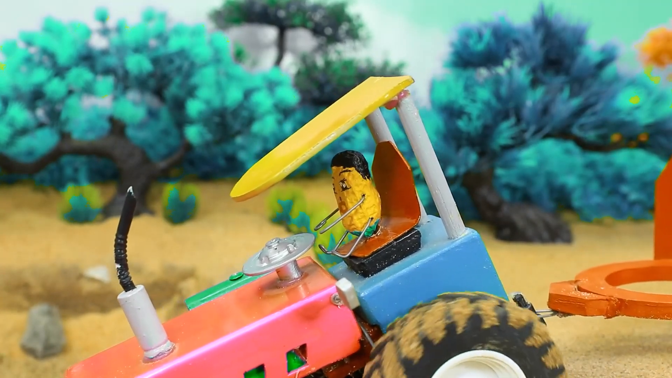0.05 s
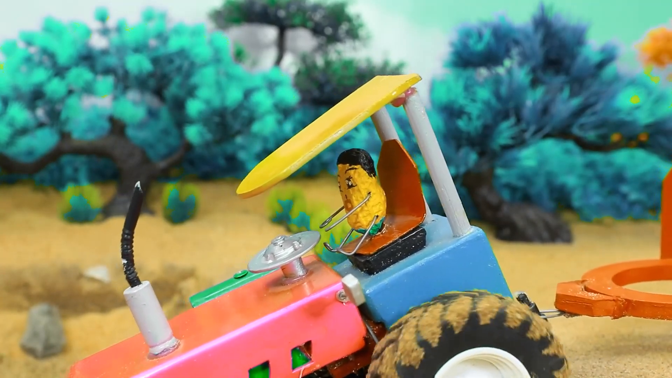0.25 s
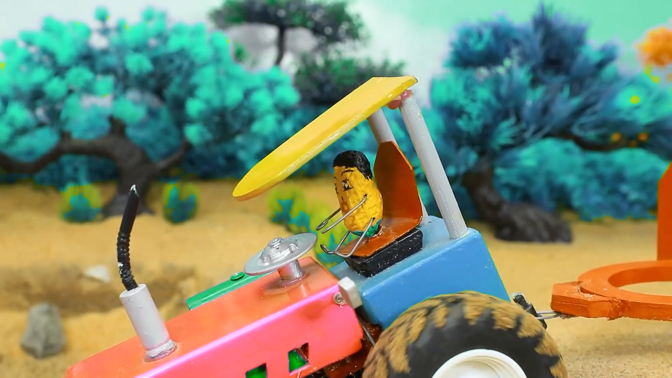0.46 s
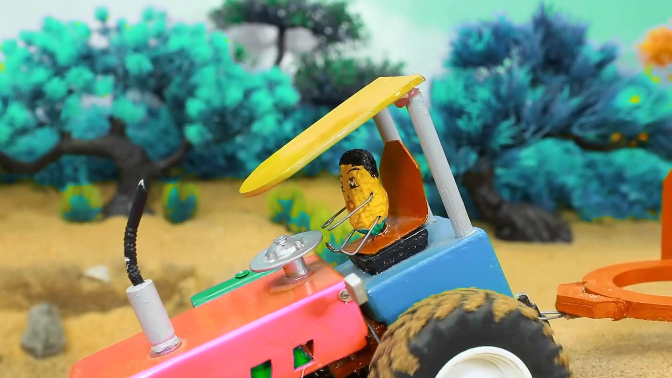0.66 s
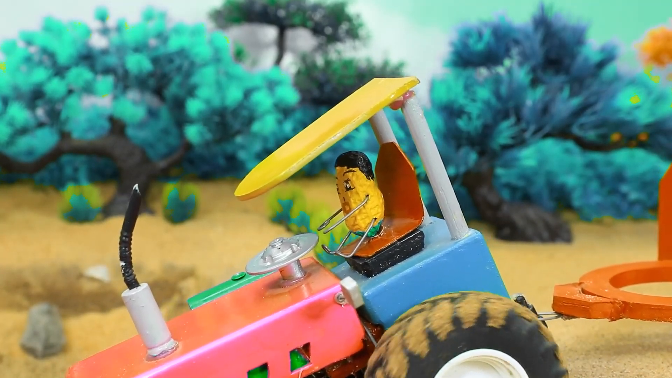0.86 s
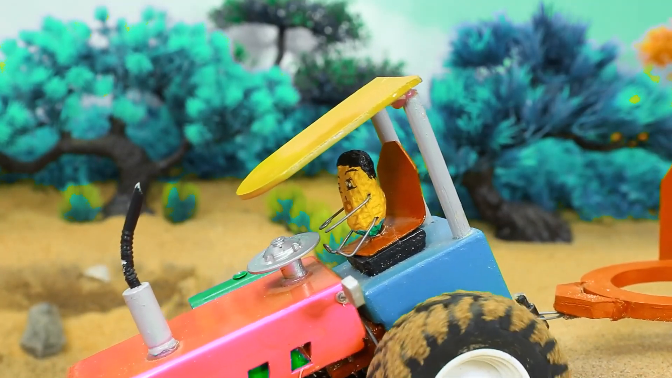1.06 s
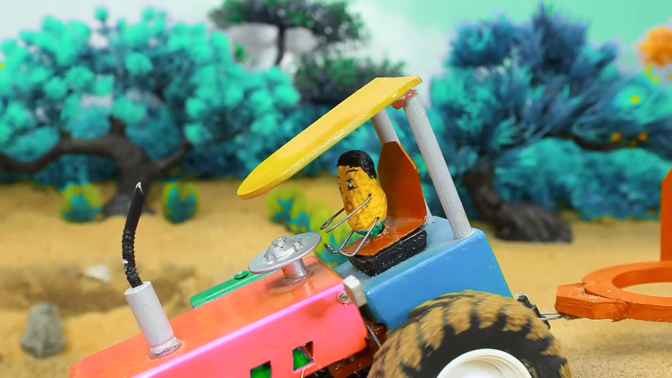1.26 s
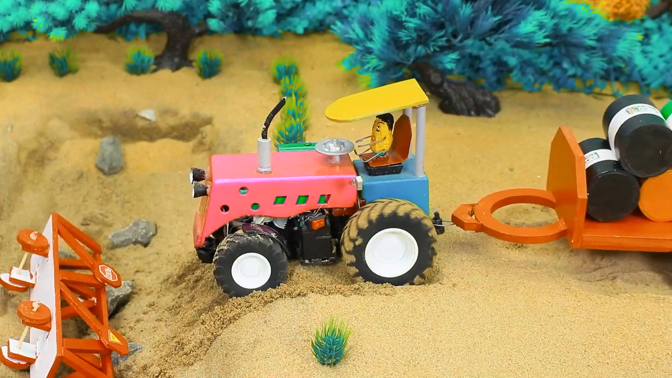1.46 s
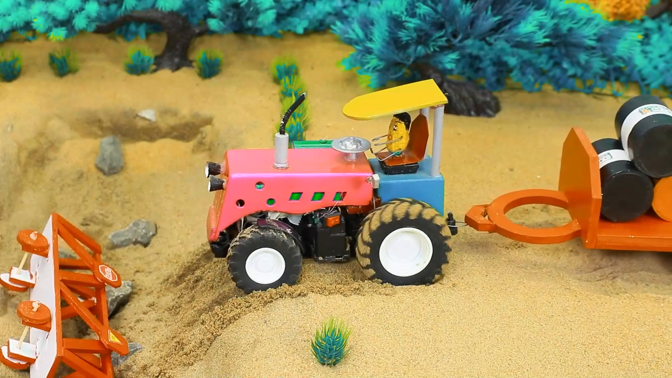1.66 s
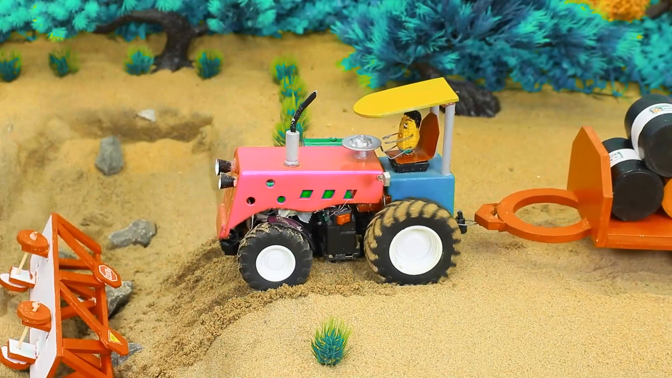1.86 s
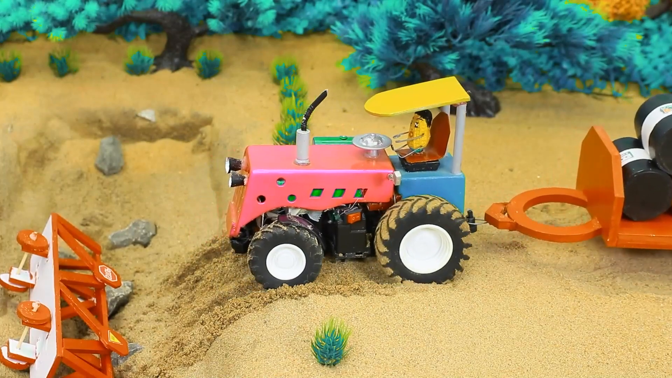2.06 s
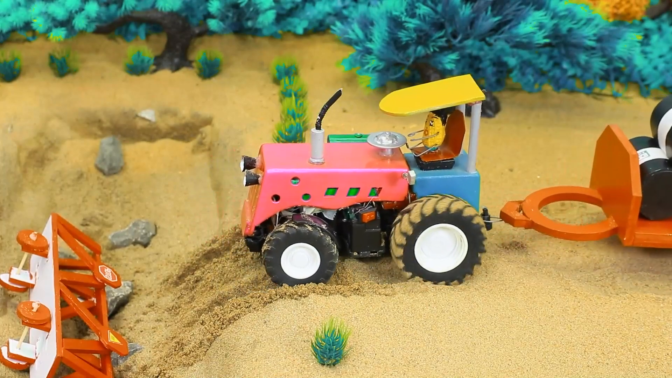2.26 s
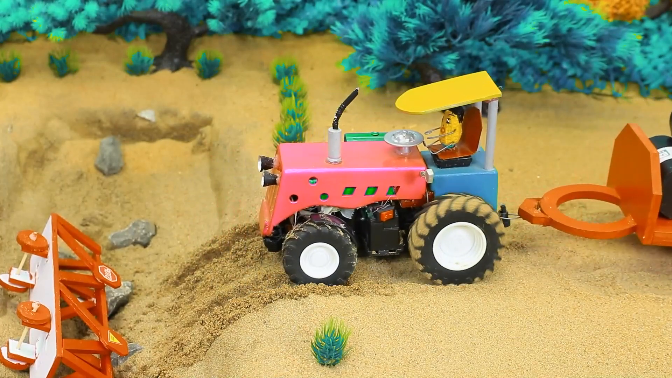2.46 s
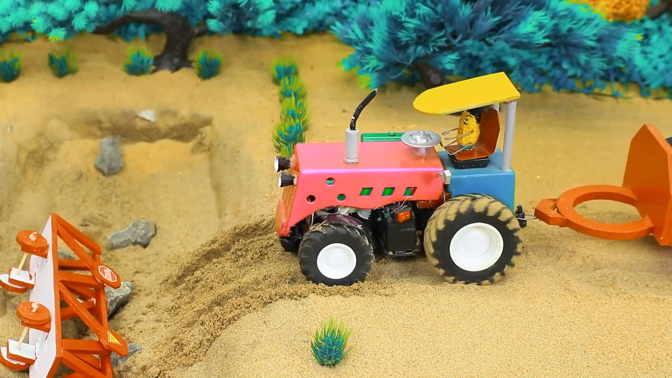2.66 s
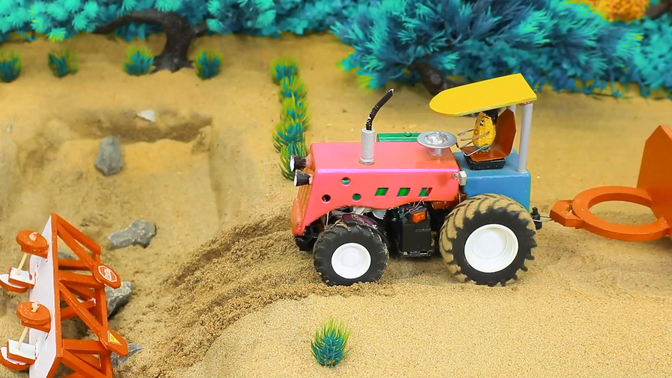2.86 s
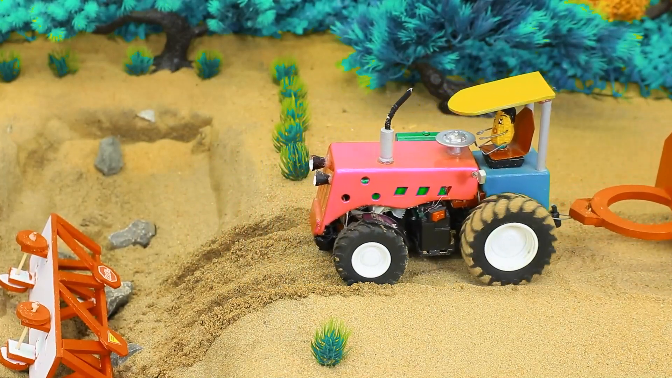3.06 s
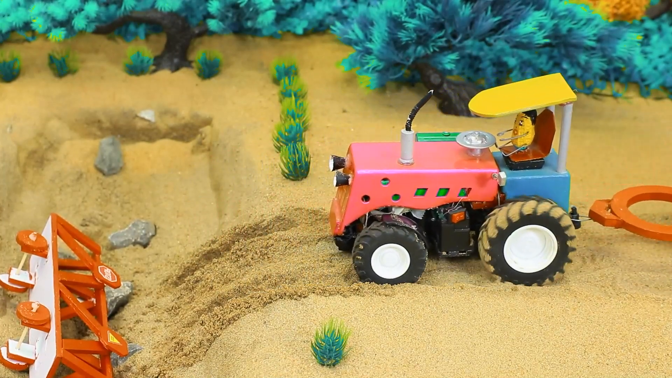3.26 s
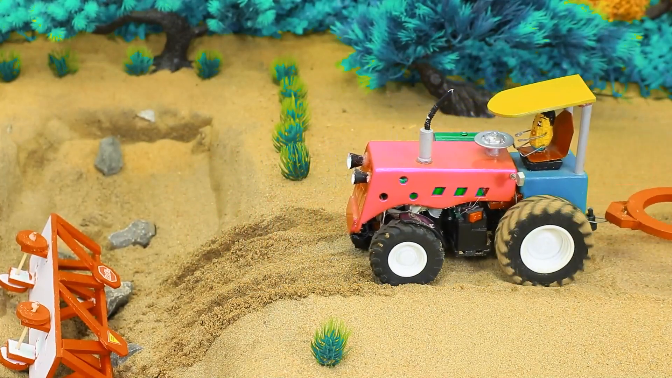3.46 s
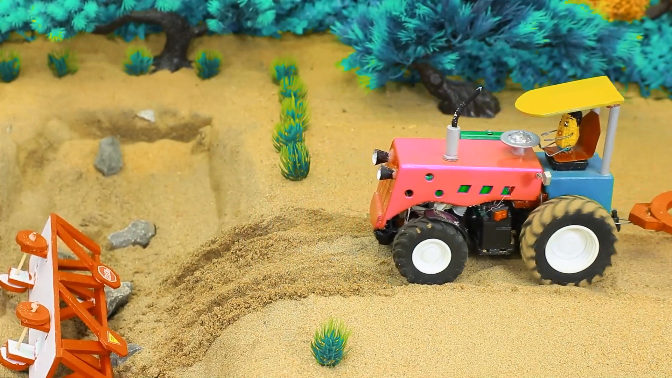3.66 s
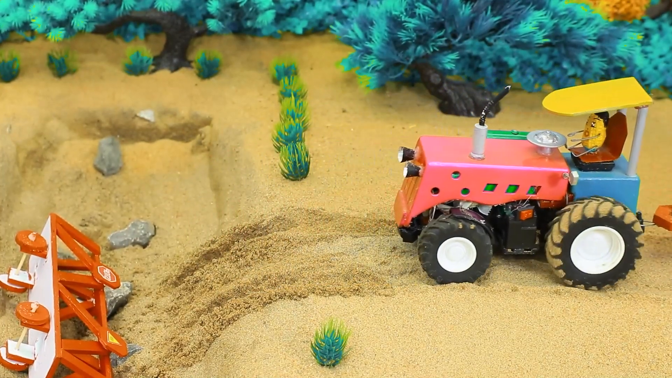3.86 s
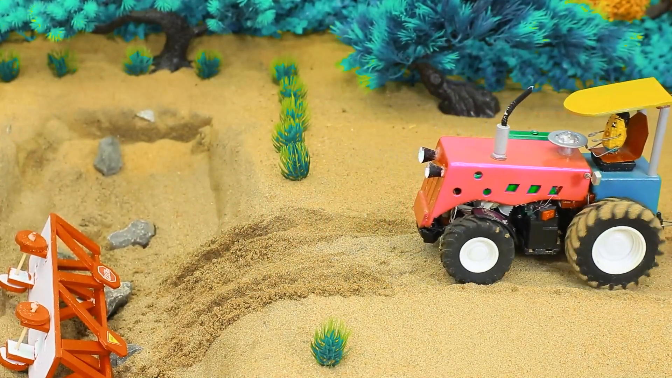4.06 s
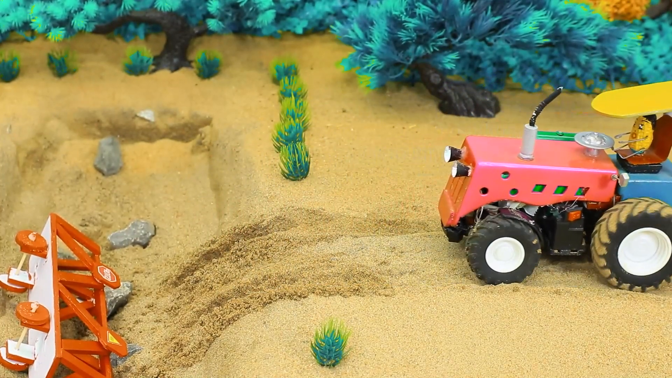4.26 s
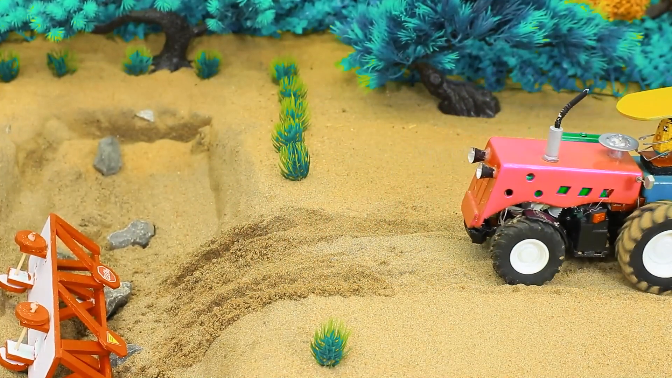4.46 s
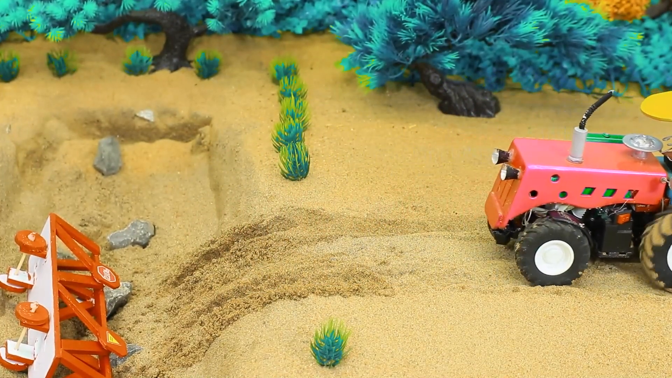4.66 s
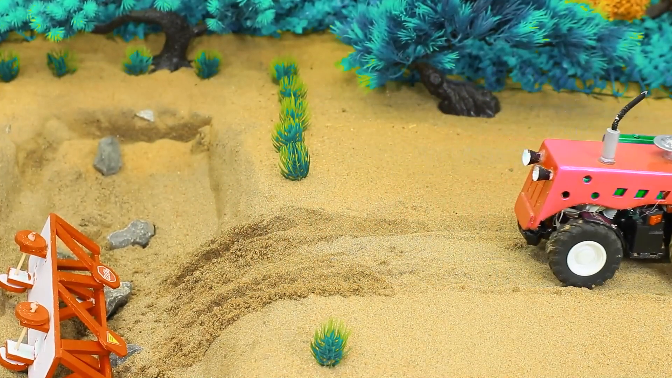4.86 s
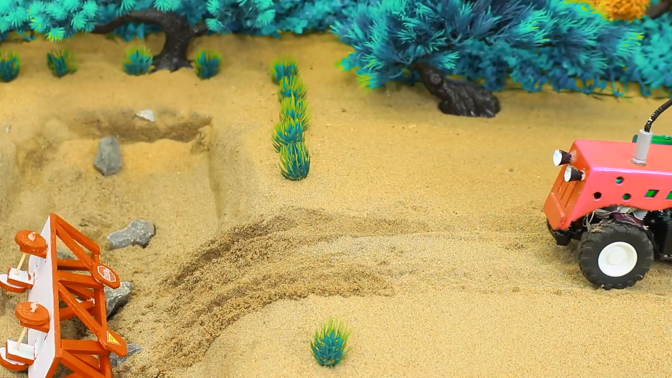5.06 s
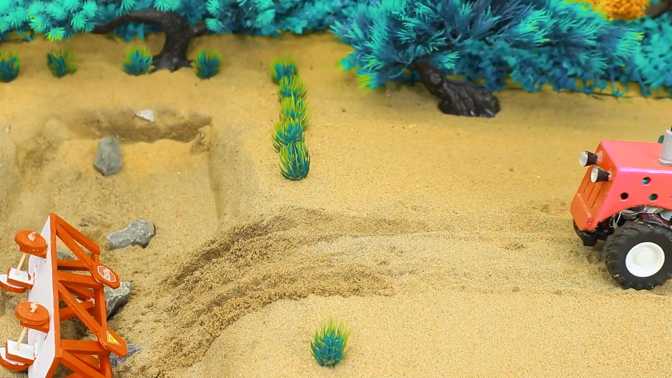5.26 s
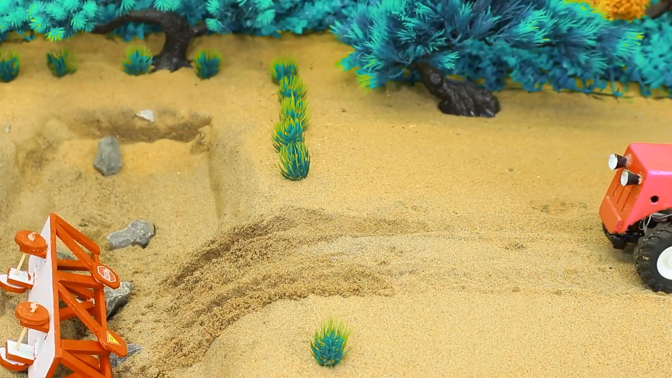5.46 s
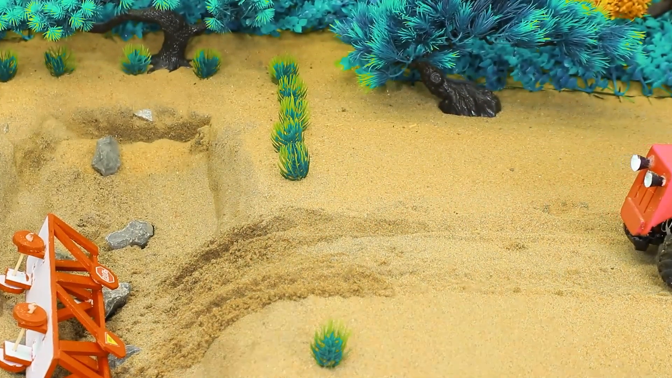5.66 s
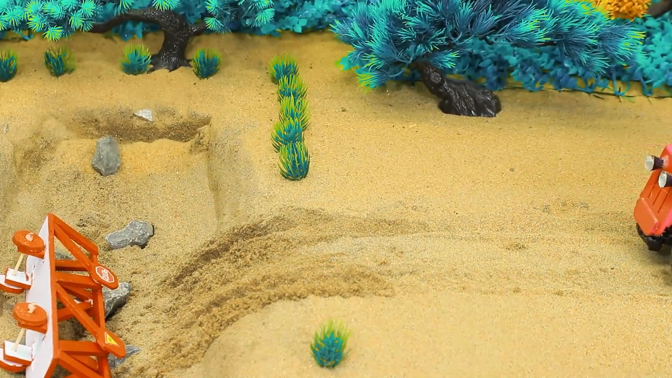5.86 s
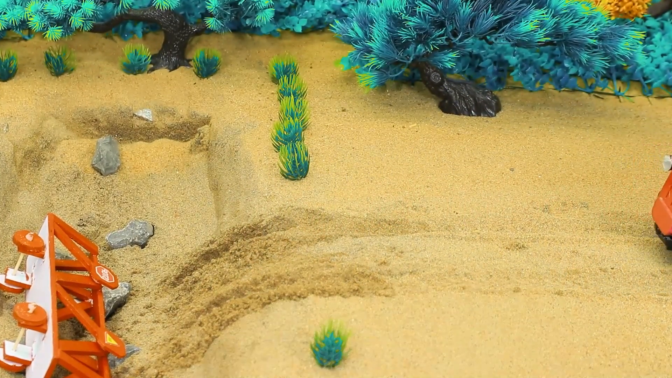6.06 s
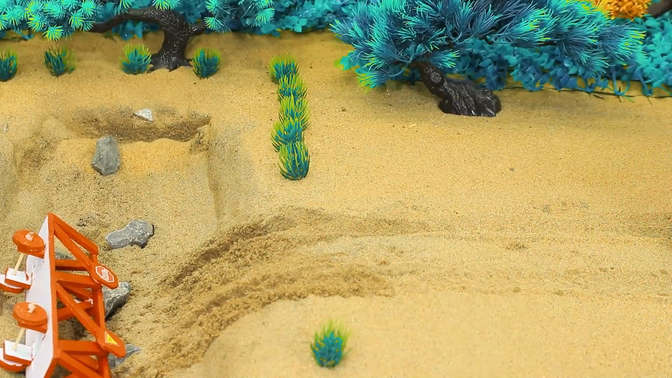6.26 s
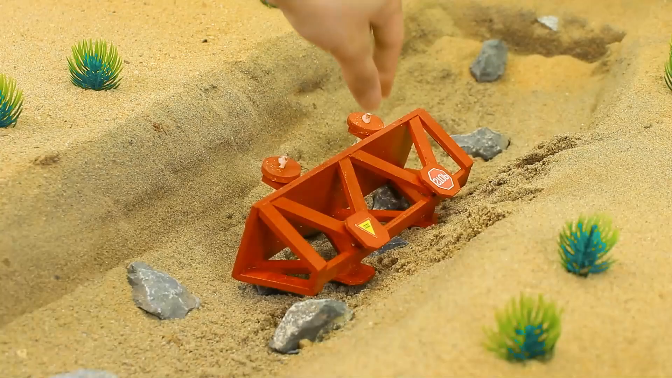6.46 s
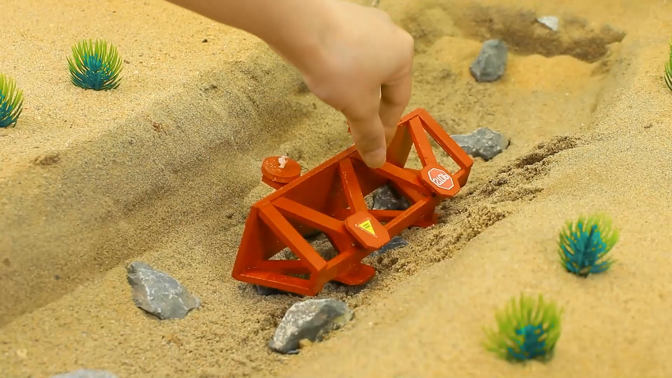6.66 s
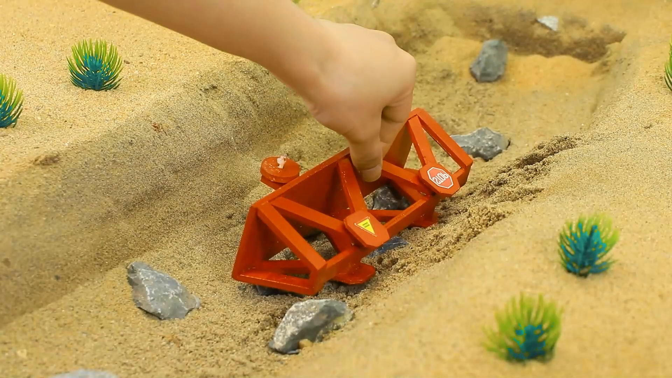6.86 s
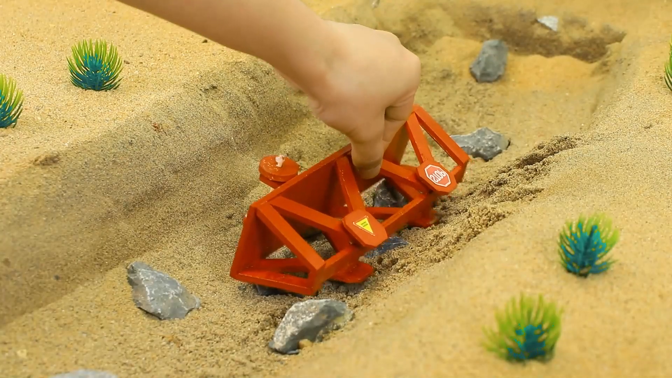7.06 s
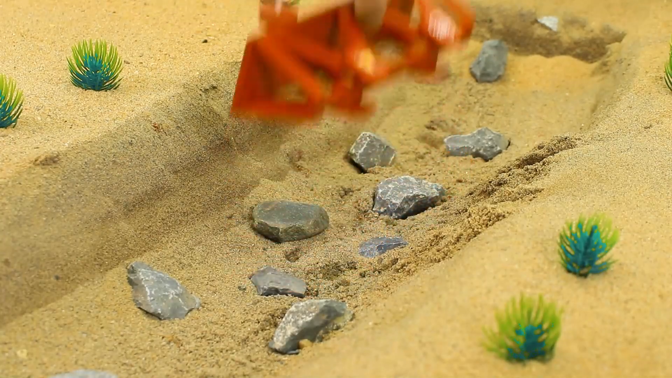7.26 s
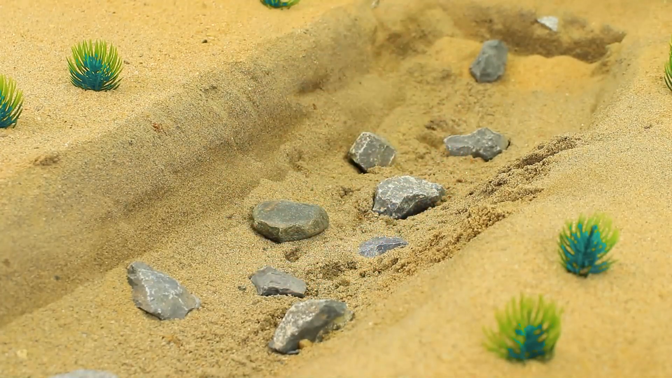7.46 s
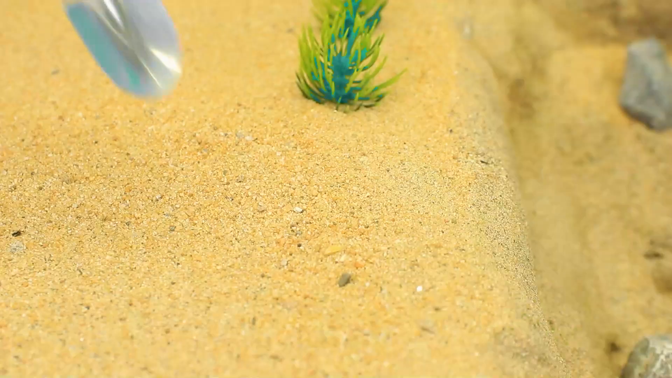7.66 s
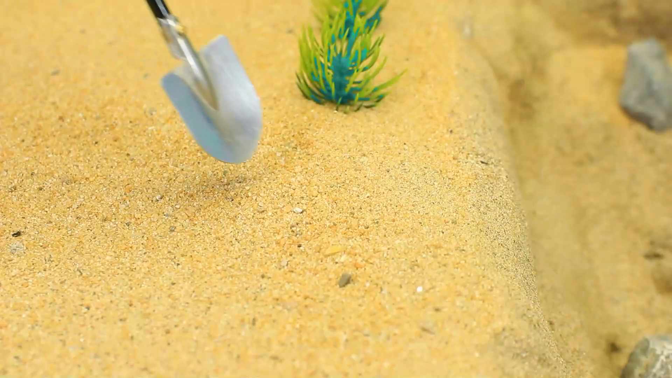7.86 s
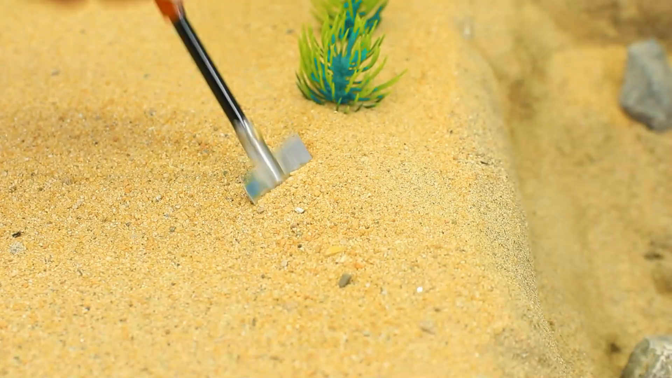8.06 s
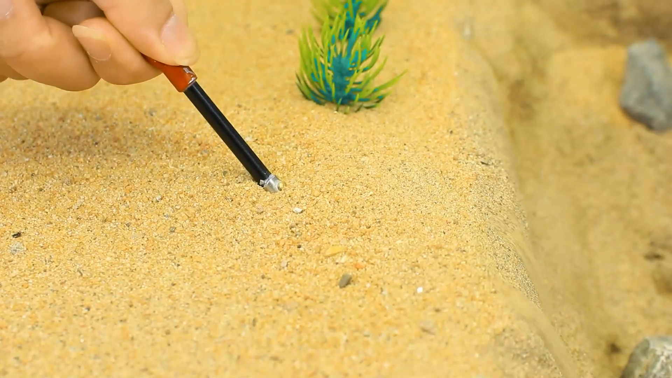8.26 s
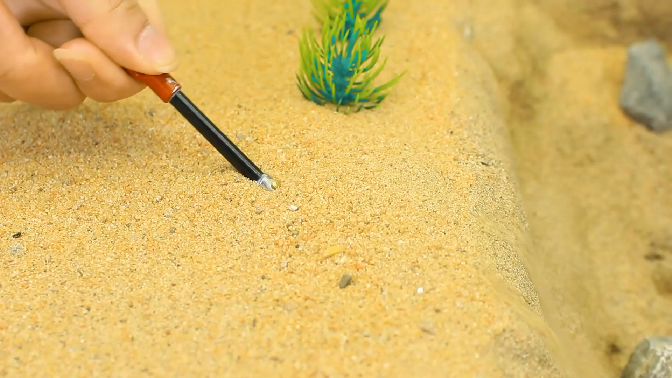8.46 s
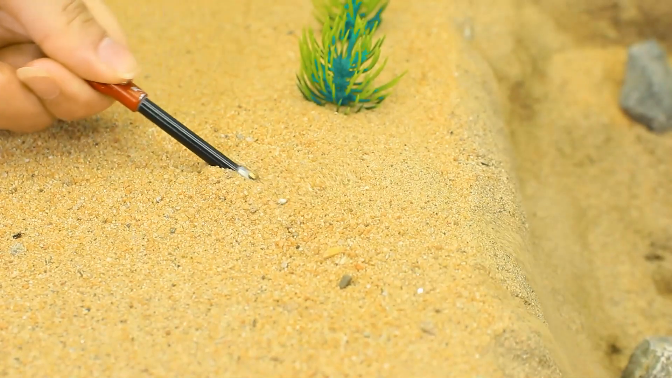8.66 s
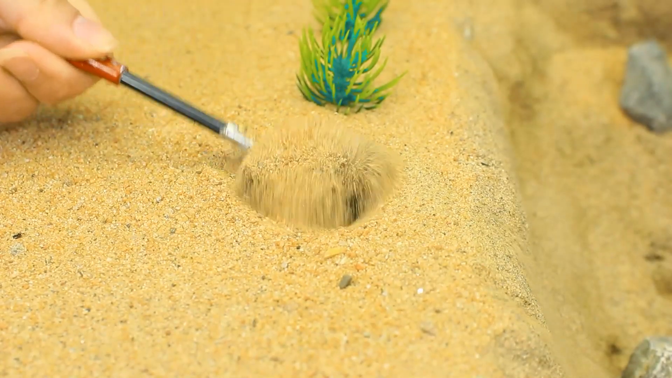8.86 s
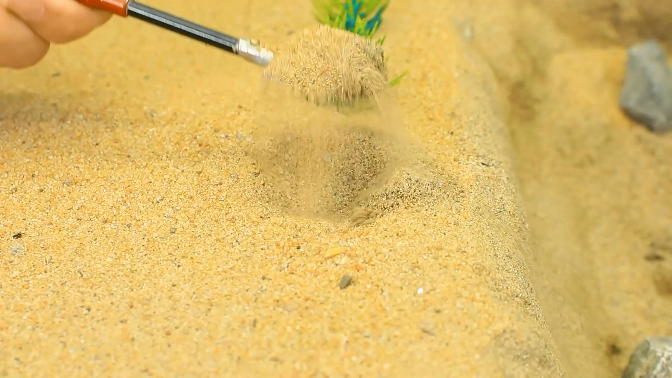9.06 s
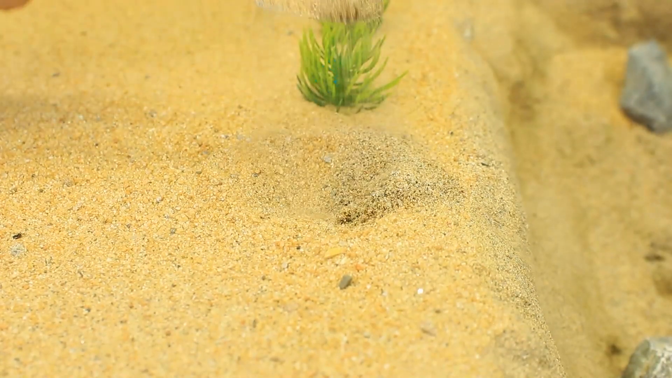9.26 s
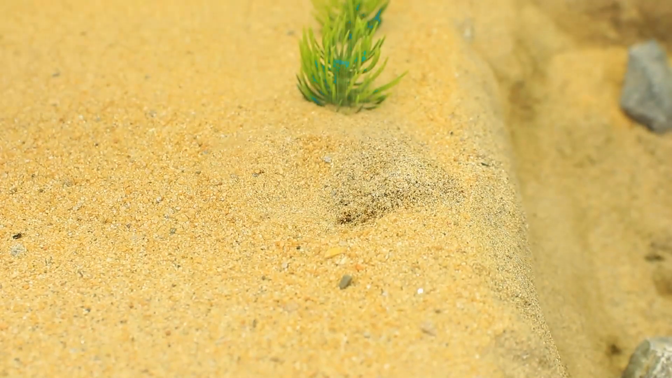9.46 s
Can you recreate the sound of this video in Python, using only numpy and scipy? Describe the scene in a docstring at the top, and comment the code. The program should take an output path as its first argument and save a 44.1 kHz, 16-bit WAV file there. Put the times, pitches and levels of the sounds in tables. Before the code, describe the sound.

Close stereo sound in a quiet outdoor place. Rhythmic cricket chirps sit to the right while a little tractor motor putters at a steady fast pace, rattling and throbbing, before fading quickly. Next comes a dull rub and a hard, hollow double clack as an implement shifts on stones, with a faint squeak and tick as it lifts. Finally a small shovel digs with short gritty, hissing pushes, leaving the crickets alone.

```python
"""Outdoors, a small tractor engine chugs at a steady speed and fades away while crickets trill on the right.
Firing-locked noise, blows, clacks and tones make the engine; short falling whistles make the crickets.
A hollow implement then lifts off some stones: a double knock of ringing modes, with a rustle of filtered grains.
Last, a shovel digs into dry sand: hissing and scraping grains swell with each push.
A low rumble and a faint hum lie beneath it all."""
import sys
import numpy as np
from scipy import signal
from scipy.fft import rfft, irfft, next_fast_len
from scipy.io import wavfile
from scipy.ndimage import uniform_filter1d

SR = 44100
rng = np.random.default_rng(int(sys.argv[2]) if len(sys.argv) > 2 else 0)


def generate_wav(sig):
    """Save sig (samples, or channels by samples) to the path in sys.argv[1] as 16-bit PCM at SR."""
    pcm = np.round(np.clip(np.atleast_2d(sig).T, -1, 1) * 32767).astype(np.int16)
    wavfile.write(sys.argv[1], SR, pcm)


N = 419832
TIME = np.arange(N) / SR  # seconds


def from_db(db):
    """Decibels to gain."""
    return 10 ** (np.asarray(db) / 20)


def rms_one(x):
    """Scale to unit rms."""
    return x / np.sqrt(np.mean(x ** 2) + 1e-20)


def drift(rate):
    """Random wander through `rate` normally distributed points per second, joined by straight lines."""
    knots = rng.standard_normal(N // 20)
    return np.interp(TIME * rate, np.arange(len(knots)), knots)


def butter(x, order, hz, kind):
    """Butterworth high-pass or low-pass."""
    return signal.sosfilt(signal.butter(order, hz, kind, fs=SR, output="sos"), x)


def coloured(x, spectrum):
    """Causal (minimum-phase) filter of unit power gain that follows a spectrum and slopes off beyond its ends."""
    size = 2 * next_fast_len(N // 2 + SR // 4)
    hz, db = np.transpose(spectrum)
    grid = np.maximum(np.arange(size // 2 + 1) * SR / size, 1)
    skirt = np.minimum(grid / hz[0], 1) ** 2 * np.minimum(hz[-1] / grid, 1) ** 4
    gain = rms_one(skirt * from_db(np.interp(np.log(grid), np.log(hz), db)))
    # folding the cepstrum onto positive times gives minimum phase
    cepstrum = irfft(np.log(gain))
    cepstrum[1:size // 2] *= 2
    cepstrum[size // 2 + 1:] = 0
    return irfft(rfft(x, size) * np.exp(rfft(cepstrum)))[..., :N]


def resonance(x, hz, width_hz):
    """Band-pass with a gain of one on top."""
    r = np.exp(-np.pi * width_hz / SR)
    poles = [1, -2 * r * np.cos(2 * np.pi * hz / SR), r * r]
    return signal.lfilter(np.array([1, 0, -1]) * (1 - r * r) / 2, poles, x)


def ring(force, hz, t60):
    """A unit click sets a sine of height one ringing; it dies by 60 dB in t60 seconds."""
    r, w = from_db(-60 / (t60 * SR)), 2 * np.pi * hz / SR
    return signal.lfilter([0, np.sin(w)], [1, -2 * r * np.cos(w), r * r], force + 1e-18)


def grains(per_s, spread_db):
    """Random clicks of uneven size, unit rms."""
    sizes = from_db(spread_db * np.minimum(rng.exponential(1, N), 4)) * rng.choice([-1, 1], N)
    return rms_one(sizes * (rng.random(N) < per_s / SR))


def held(start, length, attack, release):
    """Attack, hold until `length` has passed, release."""
    up = np.clip((TIME - start) / attack, 0, 1)
    down = np.clip(1 - (TIME - start - length) / release, 0, 1)
    return up * down ** 2


PUSH_SHAPE = 1.97  # 1 is a pointed swell, 2 a rounded one


def push(peak_s, rise_s, fall_s):
    """The force of a push builds up and lets go."""
    distance = np.maximum((peak_s - TIME) / rise_s, (TIME - peak_s) / fall_s)
    return np.exp(-distance.clip(0, 20) ** PUSH_SHAPE)


def dying(times, levels_db, t60):
    """Sudden starts that each die away."""
    return sum(from_db(db - 60 * np.maximum(TIME - s, 0) / t60) * (TIME >= s)
               for s, db in zip(times, levels_db))


FIRING_HZ, START_TURN = 24.732, .26  # firings per second; starting point in firing periods
# The engine hesitates. Each row: middle of the hesitation in seconds, delay in firing periods.
HESITATIONS = [(1.37, .40), (1.66, .14), (4.5, .14), (5.3, .42), (5.72, .13)]
# Where the count of four firings starts. Each row: from this time in seconds, place in the count.
ACCENTS = [(0, 2), (1.4, 1), (1.96, 3), (4.8, 1)]


def engine_turn():
    """Progress of the engine in firing periods: steady, slightly wandering, set back by each hesitation."""
    late = sum(delay * np.clip((TIME - s) / .08 + .5, 0, 1) for s, delay in HESITATIONS)
    since, place = np.transpose(ACCENTS)
    count_shift = place[np.searchsorted(since, TIME, "right") - 1]
    return FIRING_HZ * TIME + START_TURN - late + .003 * drift(5) - count_shift


def repeating(turn, count):
    """Vibration that comes back at the same crank angles every `count` firings."""
    return rng.standard_normal(N)[(turn % count * SR / FIRING_HZ).astype(int)]


def evened(x, span_s):
    """Noise whose lows, middle and top each hold a steady level, so that no firing flares up by chance."""
    low, mid = (signal.sosfiltfilt(signal.butter(2, hz, "low", fs=SR, output="sos"), x) for hz in (600, 1600))
    bands = (low, mid - low, x - mid)
    return rms_one(sum(b * b.std() / np.sqrt(uniform_filter1d(b * b, int(span_s * SR)) + 1e-9) for b in bands))


# Course of one firing. Each row: share of the period, relative clatter level in dB,
# relative exhaust puff level in dB.
BURST = [(-.33, 0.5, -2.5), (-.24, 1.5, -4), (-.08, 3.5, 4), (.08, 0, -0.5), (.24, 0, -3.5), (.42, -3, 1)]


def swell(turn, shape_db):
    """The rise and fall within each firing period, unit rms."""
    return rms_one(from_db(np.interp(turn, np.array(BURST)[:, 0], shape_db, period=1)))


# Four successive firings. Each row: relative clatter level in dB, relative exhaust puff level in dB.
FIRING_DB = [(2.23, 6), (2.5, 5.5), (1, 6.5), (2.5, 3.5)]
# Ringing engine panels. Each row: pitch in Hz, width in Hz, relative level in dB.
PANELS = [(303, 22, -9.5), (379, 27, -4), (490, 82, -11), (750, 18, -3.5), (862, 28, -8), (937, 9, -2),
          (974, 22, -1), (1143, 32, 1.5), (2050, 29, -6), (2340, 54, -6.5)]
# Colour of the engine clatter. Each row: frequency in Hz, relative level in dB per Hz.
CLATTER = [(35, -32.5), (60, -7), (81, -13), (119, -15.5), (149, -12), (215, -12.5), (303, -8), (561, -9),
           (1140, -3.5), (1800, -7), (2420, -10), (4370, -25), (10400, -41), (11900, -59.5), (14000, -54)]
# the clatter sinks just before the leading firing, for this share of a period
LULL_DB, LULL_SHARE = -4, 0.15
CHUG_DB = 1.3  # how far the ringing rises and sinks within a firing


def clatter(turn):
    """Each firing drives the panels with bright metal contacts and a dull puff of gas."""
    firing = np.round(turn).astype(int)
    uneven_db = np.transpose(FIRING_DB)[:, firing % len(FIRING_DB)] + 0.09 * rng.standard_normal(N)[firing]
    blow, pressure = from_db(uniform_filter1d(uneven_db, size=300))
    rattle = grains(per_s=18000, spread_db=0.0)
    rattle = rattle + 0.56 * repeating(turn, count=1) + 0.66 * repeating(turn, count=4)
    contacts = blow * evened(rattle, span_s=.01)
    rush = rng.standard_normal(N) + 0.93 * repeating(turn, count=1) + 0.74 * repeating(turn, count=4)
    gas = pressure * evened(rush, span_s=0.019)
    # the leading firing opens with a short crack after a lull
    since_crack = (turn + 0.25) % len(FIRING_DB)
    crack = from_db(-0.5 - 60 * since_crack / FIRING_HZ / 0.014)
    lull = from_db(LULL_DB * (since_crack > len(FIRING_DB) - LULL_SHARE))
    _, metal_db, gas_db = np.transpose(BURST)
    bright = butter(contacts * (lull * swell(turn, metal_db) + crack), 2, 600, "high")
    puff = butter(gas * swell(turn, gas_db), 2, 560, "low")
    drive = bright + from_db(-1.0) * puff
    panels = sum(from_db(db) * resonance(drive, hz, width) for hz, width, db in PANELS)
    ringing = rms_one(coloured(drive + panels, CLATTER))
    # the panels are damped between firings, which keeps the chugs apart
    return rms_one(ringing * from_db(CHUG_DB * np.cos(2 * np.pi * turn)))


def blowdown(turn, top_hz, fall_hz, length):
    """The leading firing whistles in the exhaust, falling as the pressure drops; length in firing periods."""
    u = np.minimum((turn + 0.065) % len(FIRING_DB) / length, 1)
    return np.sin(np.pi * u) * np.sin(2 * np.pi * np.cumsum(top_hz - fall_hz * u + 25 * drift(200)) / SR)


# Blows within a firing: diesel knock, piston slap, exhaust thump, panel rattle, the thump's echo in the pipe.
# Each row: moment as share of the period, pitch in Hz at steady speed, width as share of the period,
# then the relative level in dB in each of the four firings.
BEATS = [(-.21, 1170, 0.064, 10.5, 3, -17, -18), (-.21, 736, 0.071, -1.5, -1.5, -4.5, -23),
         (-.08, 337, 0.12, -10.5, -7.5, 0, -10), (0.116, 1170, 0.065, -22, 6, -12, -4),
         (0.251, 330, 0.12, -17.5, -20, -3.5, 1)]


def beats(turn):
    """Short pitched blows that come at the same crank angle of each firing, a little uneven in strength."""
    out = 0
    for at, hz, width, *db in BEATS:
        firing = np.round(turn - at).astype(int)
        u = turn - at - firing
        strength = from_db(np.array(db)[firing % len(db)] + rng.standard_normal(N)[firing])
        out = out + strength * np.exp(-(u / width) ** 2) * np.cos(2 * np.pi * hz * u / FIRING_HZ)
    return out


# Clacks of loose parts. Each row: moment in the round of four in firing periods, pitch in Hz, width in Hz,
# time to fall by 60 dB in seconds, relative level in dB.
CLACKS = [(.07, 1780, 870, 0.023, -2), (.66, 3300, 2500, 0.049, -10.5), (1.02, 1118, 390, 0.027, 0),
          (1.85, 1060, 400, 0.038, -3.5), (2.65, 3066, 2480, 0.038, -7.5), (3.16, 1600, 1100, 0.039, -3.5),
          (3.84, 5600, 2400, 0.079, -15.5)]
CLACK_ATTACK_S = 0.0013


def clacks(turn):
    """Loose parts strike at the same places in each round of four firings and ring briefly."""
    out = 0
    for at, hz, width, t60, db in CLACKS:
        age = (turn - at) % len(FIRING_DB) / FIRING_HZ
        ringing = rms_one(resonance(resonance(rng.standard_normal(N), hz, width), hz, width))
        out = out + from_db(db - 60 * age / t60) * np.minimum(age / CLACK_ATTACK_S, 1) * ringing
    return out


# Exhaust throb. Each row: multiple of the firing rate, relative level in dB.
THROB = [(1, -23.5), (2, 5.5), (3, 7), (4, -2), (5, -19), (6, -2), (12, -6.5), (15, -12.5), (20, -3.5),
         (29, -7.5), (30, -10.5), (38, 0), (46, 1), (47, -3)]
THROB_AT = .25  # share of the period at which the tones peak together


def exhaust_throb(turn):
    """Harmonics of the firing rate, each wavering slightly in level."""
    return sum(from_db(db + 0.23 * drift(21)) * np.cos(2 * np.pi * round(k) * (turn - THROB_AT))
               for k, db in THROB)


# Gaps between the resonances. Each row: pitch in Hz, width in Hz, share cancelled.
HOLLOWS = [(925, 43, 0.35), (1050, 20, 0.33), (1204, 23, 0.535), (1775, 73, 0.42), (1940, 18, .45),
           (2280, 61, 0.42)]
# the engine holds one level, then fades to nothing
ENGINE_DB, FADE_FROM_S, FADE_S, FADE_POWER = -24.5, 5.615, 0.74, 0.88


def engine():
    """Each firing sets off clatter, blows and clacks, with a throb and a whistle from the exhaust."""
    turn = engine_turn()
    whistle = from_db(2.5) * blowdown(turn, top_hz=1228, fall_hz=417.5, length=0.73)
    chugs = from_db(0.4) * clatter(turn) + whistle + beats(turn) + clacks(turn)
    for hz, width, share in HOLLOWS:
        chugs = chugs - share * resonance(chugs, hz, width)
    loudness = from_db(ENGINE_DB) * np.clip(1 - (TIME - FADE_FROM_S) / FADE_S, 0, 1) ** FADE_POWER
    return loudness * (chugs + from_db(-17.5) * exhaust_throb(turn))


# Colour of the low outdoor rumble. Each row: frequency in Hz, relative level in dB per Hz.
RUMBLE = [(25, -4), (43, -11), (82, -8.5), (130, -15.5), (180, -26), (220, -22), (270, -32), (600, -32),
          (820, -25), (1100, -29), (1500, -19.5)]


def outdoors():
    """Distant rumble: mostly alike at both ears in the bass, diffuse above it."""
    shared = butter(rng.standard_normal(N), 2, 400, "low")
    diffuse = butter(rng.standard_normal((2, N)), 1, 450, "high")
    air = shared + 0.054 * diffuse + 0.075 * rng.standard_normal((2, N))
    return from_db(-47.5) * coloured(air, RUMBLE)


HUM_HZ, HUM_DB = 220.7, -70  # rms level


def hum():
    """A faint distant tone that wavers a little in level and phase."""
    tone = np.sqrt(2) * np.sin(2 * np.pi * HUM_HZ * TIME + 0.4 * drift(7.9))
    return from_db(HUM_DB + 1.2 * drift(6.7)) * tone


SOFT_STROKE_TAPER = 1.4  # dB lost over a stroke for each dB that it is softer


def whistles(strokes, chirp_s, top_hz, fall_hz, overtone_db):
    """Each wing stroke (s, dB) is a short falling whistle; its octave rings in a higher wing resonance."""
    tone, octave = np.zeros((2, N + SR))
    u = np.arange(int(chirp_s * SR)) / (chirp_s * SR)
    for (s, db), tune in zip(strokes, rng.standard_normal(len(strokes))):
        at = max(int((s - chirp_s / 2) * SR), 0) + np.arange(len(u))
        phase = 2 * np.pi * np.cumsum(top_hz * (1 + 0.0035 * tune) - fall_hz * u) / SR
        arch = np.sin(np.pi * u) ** 2
        # soft strokes lean towards their start
        strength = from_db(db + min(db, 0) * SOFT_STROKE_TAPER * (u - .5))
        tone[at] += strength * arch ** 2 * np.sin(phase)
        octave[at] += strength * arch * np.sin(2 * phase)
    return (tone + from_db(overtone_db) * resonance(octave, hz=6140, width_hz=390))[:N]


# Trills of the near cricket. Each row: last wing stroke in seconds, relative level in dB,
# time at full strength in seconds, lead of the neighbour's last stroke in seconds.
TRILLS = [(0.417, -3, 0.13, .08), (.81, -4.5, 0.056, 0.075), (1.233, -4, 0.076, 0.1),
          (1.646, -3.5, 0.092, 0.06), (2.062, -2.5, 0.069, 0.045), (2.496, -3.5, .12, 0.065),
          (2.92, -2, 0.07, 0.07), (3.347, -1.5, 0.055, 0.12), (3.794, -4.5, 0.059, .08),
          (4.256, -4, 0.091, 0.092), (4.791, -2, 0.059, 0.074), (5.216, -2.5, 0.083, 0.11),
          (5.627, -3, 0.094, 0.16), (6.057, -2.5, 0.089, 0.1), (6.516, -2.5, 0.14, .155),
          (6.966, -1.5, 0.11, .099), (7.395, -2, 0.11, 0.087), (7.851, -3, 0.12, .116),
          (8.275, -3.5, 0.1, 0.12), (8.674, -3, 0.099, 0.017), (9.075, -4.5, 0.11, -.016),
          (9.496, -1.5, 0.068, -.043)]
# Moments in seconds at which the near cricket skips a stroke.
SKIPS = [6.43, 7.338]
STROKE_SPACING_S = .0287
# a trill grows from its soft opening strokes; each stroke's level also scatters by chance
TRILL_RISE_DB_PER_S, SOFTEST_STROKE_DB, STROKE_SCATTER_DB = 96, -8.5, 2.5


def trills(count, spacing_s):
    """Wing strokes (s, dB), `count` to a trill: soft at first, growing to full strength; a few are skipped."""
    strokes = []
    for end, db, hold, _ in TRILLS:
        for early, chance in zip(spacing_s * np.arange(count), rng.standard_normal(count)):
            growth_db = max(-TRILL_RISE_DB_PER_S * max(early - hold, 0), SOFTEST_STROKE_DB)
            strokes.append((end - early, db + growth_db + STROKE_SCATTER_DB * chance))
    return [(s, db) for s, db in strokes if np.abs(s - np.array(SKIPS)).min() > spacing_s / 2]


def answers(count, spacing_s, taper_db):
    """Wing strokes (s, dB) of the neighbour: a short growing trill timed against each near trill."""
    return [(end - lead - k * spacing_s, -taper_db * k) for end, _, _, lead in TRILLS for k in range(count)]


def far_crickets(count):
    """Faint strokes at random moments."""
    strokes = np.column_stack([rng.uniform(0, N / SR, count), 3.5 * rng.standard_normal(count)])
    return whistles(strokes, chirp_s=0.019, top_hz=3675, fall_hz=540, overtone_db=-8.0)


# Colour of the distant insect chorus. Each row: frequency in Hz, relative level in dB per Hz.
CHORUS = [(1200, -63), (2500, -24.5), (2850, -14.5), (3150, -1), (3450, 3), (3850, -16), (4400, -5.5),
          (5100, -1), (5900, -14.5), (6800, -19.5), (7700, -40), (9200, -15), (11300, -36.5), (13500, -34)]
CRICKET_LAG_S = .00068  # the near pair sits on the right and reaches the left ear late


def crickets():
    """A near cricket on the right, a neighbour that trills along, their echoes, and a wide far chorus."""
    near_strokes = trills(count=10, spacing_s=STROKE_SPACING_S)
    near = from_db(-25.0) * whistles(near_strokes, chirp_s=0.035, top_hz=3956, fall_hz=1393, overtone_db=-17)
    replies = answers(count=5, spacing_s=STROKE_SPACING_S, taper_db=1.2)
    neighbour = from_db(-28.5) * whistles(replies, chirp_s=0.028, top_hz=3740, fall_hz=845, overtone_db=-9)
    pair = near + neighbour
    # echoes: a separate dying noise tail for each ear
    tail = TIME[:SR // 3]
    scatter = rng.standard_normal((2, len(tail))) * from_db(-60 * tail / 0.19)
    scatter /= np.linalg.norm(scatter, axis=1, keepdims=True)
    echoes = from_db(-14.0) * signal.fftconvolve(pair[None], scatter, axes=1)[:, :N]
    direct = np.array([from_db(-8.0) * np.interp(TIME - CRICKET_LAG_S, TIME, pair), pair])
    far = from_db(-41.5) * np.array([far_crickets(count=900), far_crickets(count=900)])
    chorus = from_db(-42.5) * coloured(rng.standard_normal((2, N)) * from_db(1.6 * drift(60)), CHORUS)
    # all of the crickets are softer on the left
    return (direct + echoes + far + chorus) * from_db([[-5.5], [0]])


# The implement rubs on the ground. Each row: start in seconds, length in seconds,
# rumble level in dB, squeak level in dB.
RUBS = [(6.934, 0.083, -39, -66), (7.22, 0.022, -39, -72), (7.249, 0.062, -40, -49.5)]
# Colour of the rubbing rumble. Each row: frequency in Hz, relative level in dB per Hz.
RUB_COLOUR = [(50, -18), (110, 3), (160, 9), (270, -4), (500, -7.5), (900, -20), (1500, -20), (2500, -22),
              (8000, -29), (14000, -64)]
# Plastic squeaks on stone. Each row: pitch in Hz, width in Hz, relative level in dB.
SQUEAK = [(1310, 88, 0), (1600, 51, -5), (2310, 91, -28)]
RUB_ATTACK_S, RUB_RELEASE_S = 0.026, 0.015


def rubbing():
    """The implement slips over sand and stone with a dull rumble and a thin squeak."""
    rumble, squeak = sum(from_db([[rumble_db], [squeak_db]]) * held(s, length, RUB_ATTACK_S, RUB_RELEASE_S)
                         for s, length, rumble_db, squeak_db in RUBS)
    slips = grains(per_s=8300, spread_db=3.0)
    ringing = rms_one(sum(from_db(db) * resonance(slips, hz, width) for hz, width, db in SQUEAK))
    return rumble * coloured(slips, RUB_COLOUR) + squeak * ringing


# The implement knocks. Each row: time in seconds, relative body level in dB, relative sharp tick level in dB.
KNOCKS = [(6.986, -60, -37), (7.0075, -12.5, -29), (7.011, -12.5, -45), (7.0195, -32, -40),
          (7.0275, -25, -42), (7.035, -27, -30), (7.065, -34, -50.5), (7.075, -35, -48),
          (7.0773, -18.5, -26), (7.0852, -24, -42), (7.104, -36, -60), (7.251, -53, -53), (7.324, -57, -48)]
# Modes of its hollow body. Each row: pitch in Hz, relative level in dB, time to fall by 60 dB in seconds.
BODY = [(120, -7, 0.13), (150, -20, 0.2), (267, -13, 0.18), (386, -18, 0.14), (446, -19, 0.11),
        (511, -15, .13), (543, -0.5, 0.03), (654, -8, 0.041), (798, -16, 0.13), (970, -16, .051),
        (1180, -12, 0.038), (1420, -14, 0.06), (1580, -7, 0.025), (1866, -7.5, 0.037), (1960, -15, 0.054),
        (2110, -9.5, .035), (2520, -8.5, 0.026)]


def hollow_body(at, body_db):
    """Knocks at the given samples set the body's modes ringing, each mode struck a little unevenly."""
    out = np.zeros(N)
    for k, (hz, db, t60) in enumerate(BODY):
        blows = np.zeros(N)
        blows[at] = from_db(body_db + db + 2 * rng.standard_normal(len(at)))
        out += (-1) ** k * ring(blows, hz, t60)
    # keep the low leakage of the ringing filters out of the knock
    return butter(out, 2, 70, "high")


# Colour of the stone contact. Each row: frequency in Hz, relative level in dB per Hz.
TICK = [(300, -18), (1500, 2), (2500, 4), (3500, 6), (5000, -3.5), (6500, 5.5), (8500, -4), (10500, -12.5),
        (12000, -43), (15000, -47)]
# Colour of the thin shell's dense, dying ring. Each row: frequency in Hz, relative level in dB per Hz.
SHELL = [(150, -8.5), (300, -1.5), (550, -4), (900, -7.5), (1500, -14), (2400, -19), (3300, -28)]
# It booms as it rocks. Each row: peak in seconds, rise in seconds, fall in seconds, pitch in Hz, level in dB.
BOOMS = [(7.02, 0.0092, 0.017, 120.7, -23), (7.066, .016, 0.011, 173, -24.5),
         (7.085, .006, 0.015, 143, -21.5), (7.106, 0.0064, .011, 161, -20)]
# its edge snaps free of the last stone
SNAP_S, SNAP_HZ, SNAP_T60_S, SNAP_DB = 7.3245, 1700, .009, -27


def implement():
    """Hard contacts tick on stone and set the hollow body ringing; it booms as it rocks and snaps free at last."""
    s, body_db, tick_db = np.transpose(KNOCKS)
    body = hollow_body(np.round(s * SR).astype(int), body_db)
    crack = from_db(5.5) * coloured(dying(s, tick_db, t60=.019) * rng.standard_normal(N), TICK)
    shell = from_db(-13.5) * coloured(dying(s, body_db, t60=0.15) * rng.standard_normal(N), SHELL)
    boom = sum(from_db(db) * push(peak, rise, fall) * np.sin(2 * np.pi * hz * (TIME - peak))
               for peak, rise, fall, hz, db in BOOMS)
    snap = from_db(SNAP_DB) * ring(np.arange(N) == int(SNAP_S * SR), SNAP_HZ, SNAP_T60_S)
    return body + crack + shell + boom + snap


# Pushes of the shovel. Each row: greatest force in seconds, rise in seconds, fall in seconds,
# relative sand hiss level in dB, relative blade scrape level in dB.
PUSHES = [(8.112, .008, .02, -35.5, -65), (8.158, 0.032, 0.042, -25, -48), (8.225, .025, 0.04, -31.5, -59),
          (8.287, 0.038, 0.022, -26.5, -41), (8.362, 0.012, 0.044, -39.5, -62),
          (8.55, 0.051, 0.063, -31.5, -45.5), (8.638, 0.028, 0.047, -35, -46),
          (8.762, 0.03, 0.03, -44, -51), (8.815, .03, 0.052, -56.5, -61)]
# Colours of the hissing sand, the scraping blade and the sparse grit.
# Each row: frequency in Hz, relative level in dB per Hz.
SAND = [(1470, -41), (2500, -4.5), (3350, -1.5), (4350, -7.5), (5150, -4.5), (5470, -2), (11300, 0.5),
        (13800, -1), (15700, -11)]
BLADE = [(88, -36), (150, -10), (519, -3), (667, -2), (878, 0.5), (2310, -0.5), (2600, -2), (3380, -38),
         (5720, -120)]
GRIT = [(400, 0), (900, -2.5), (2400, -7), (6500, -2), (12000, -2)]
# between pushes the blade drags lightly through the sand; levels are relative
DRAG_FROM_S, DRAG_S, DRAG_ATTACK_S, DRAG_RELEASE_S = 8.1, 0.637, .04, 0.068
DRAG_HISS_DB, DRAG_SCRAPE_DB = -43.5, -52.5


def shovel():
    """Sand grains hiss along the blade, which scrapes with a duller crunch; both swell with every push."""
    light = held(DRAG_FROM_S, DRAG_S, DRAG_ATTACK_S, DRAG_RELEASE_S)
    drag = from_db([[DRAG_HISS_DB], [DRAG_SCRAPE_DB]]) * light
    pushes = [from_db([[hiss_db], [scrape_db]]) * push(s, rise, fall)
              for s, rise, fall, hiss_db, scrape_db in PUSHES]
    hiss, scrape = np.sqrt(drag ** 2 + sum(p ** 2 for p in pushes))
    sand = hiss * coloured(grains(per_s=25000, spread_db=3.0), SAND)
    blade = scrape * coloured(grains(per_s=3200, spread_db=1.0), BLADE)
    grit = hiss * coloured(grains(per_s=350, spread_db=4.5), GRIT)
    digging = from_db(1.4) * sand + from_db(3.5) * blade + from_db(-13) * grit
    return digging * from_db(1.3 * drift(120))


def scene():
    """Engine and tools in the middle, near crickets on the right, rumble and far chorus spread wide."""
    return engine() + outdoors() + hum() + crickets() + rubbing() + implement() + shovel()


def record(dry):
    """The top is cut steeply above 15.6 kHz."""
    return signal.sosfilt(signal.ellip(10, .1, 80, 15600, fs=SR, output="sos"), dry)


dry = scene()
out = record(dry)
generate_wav(out)
```